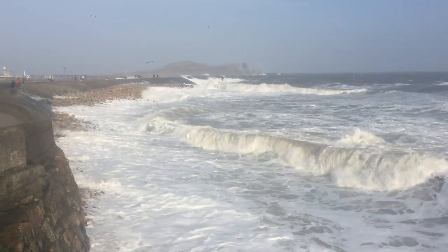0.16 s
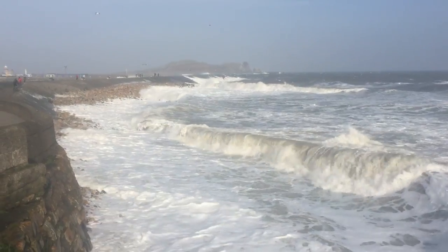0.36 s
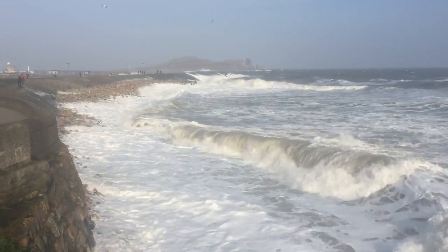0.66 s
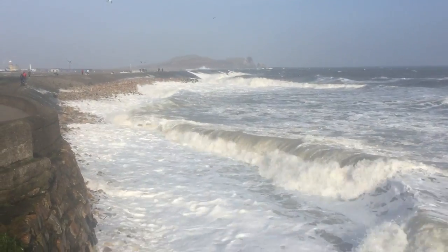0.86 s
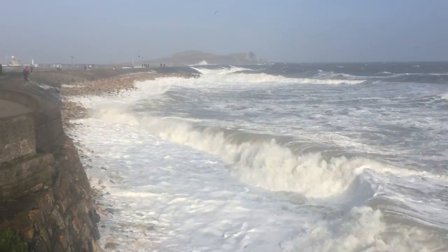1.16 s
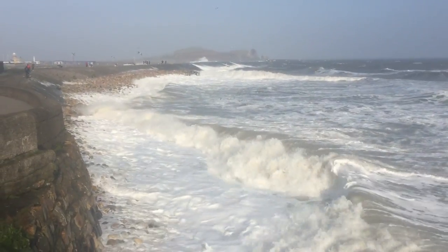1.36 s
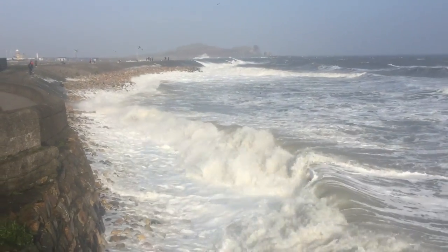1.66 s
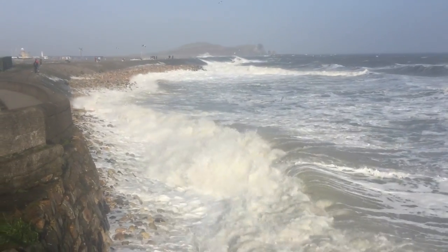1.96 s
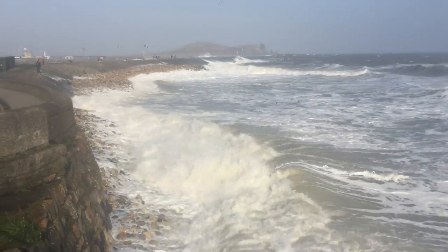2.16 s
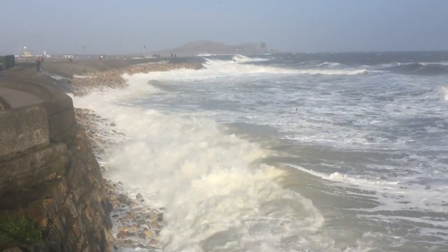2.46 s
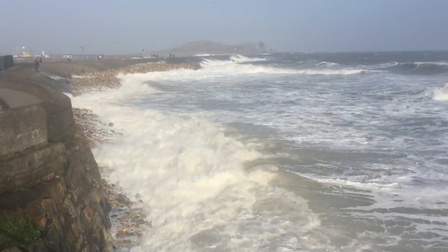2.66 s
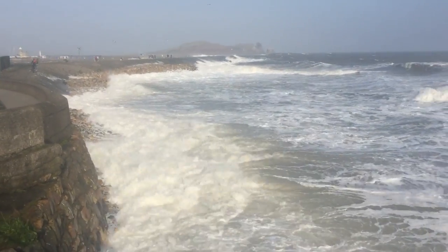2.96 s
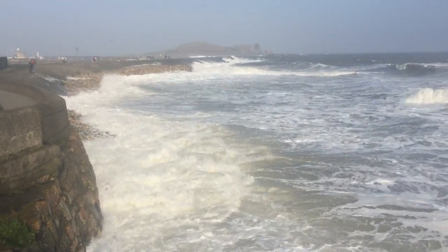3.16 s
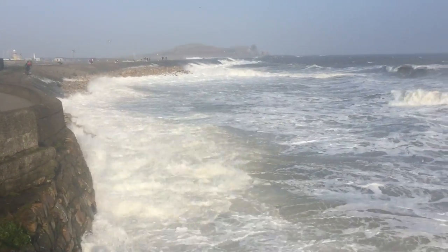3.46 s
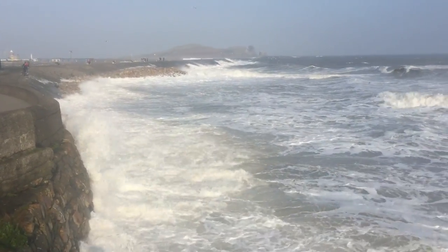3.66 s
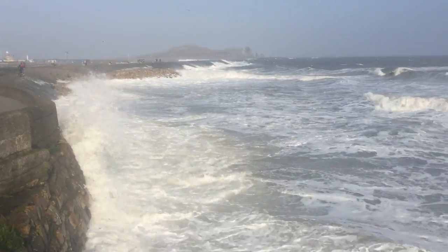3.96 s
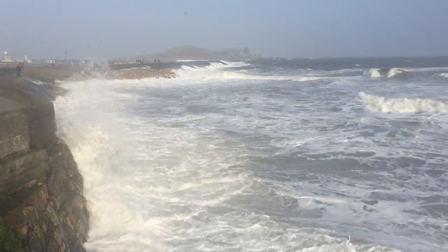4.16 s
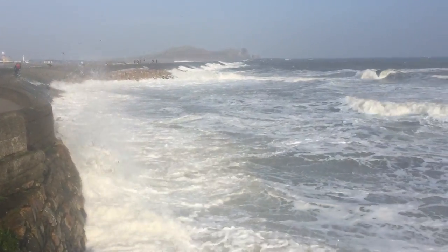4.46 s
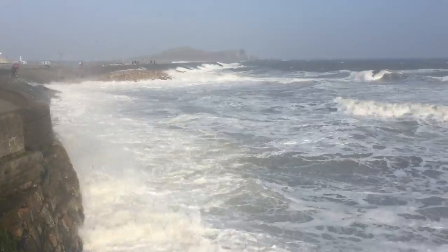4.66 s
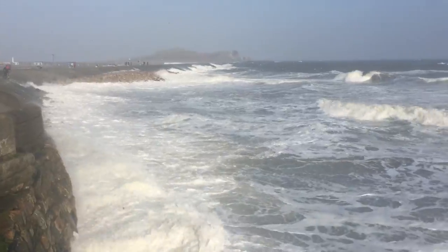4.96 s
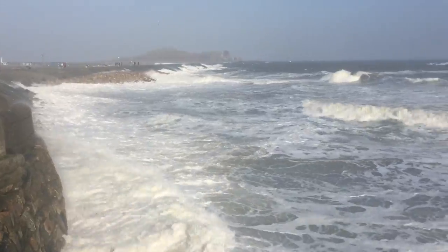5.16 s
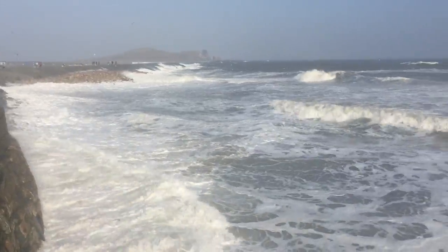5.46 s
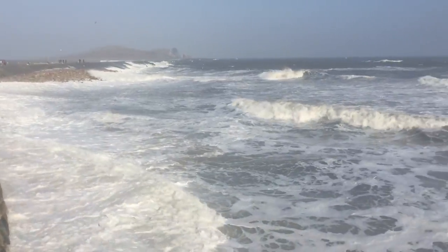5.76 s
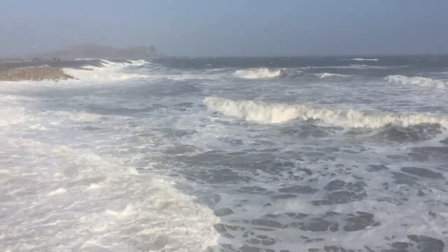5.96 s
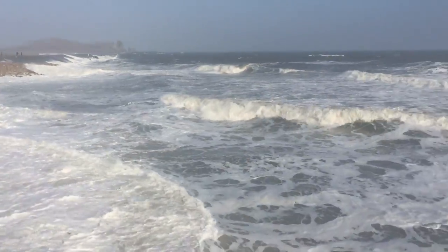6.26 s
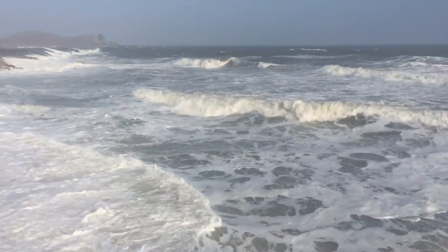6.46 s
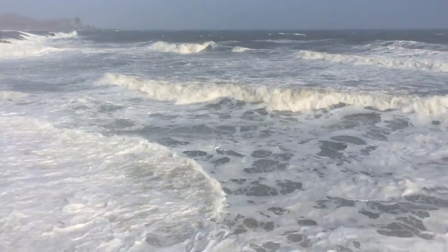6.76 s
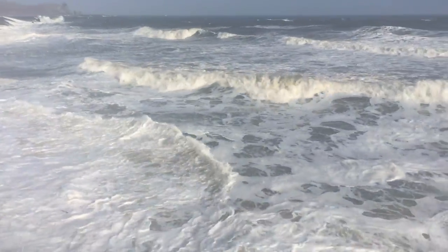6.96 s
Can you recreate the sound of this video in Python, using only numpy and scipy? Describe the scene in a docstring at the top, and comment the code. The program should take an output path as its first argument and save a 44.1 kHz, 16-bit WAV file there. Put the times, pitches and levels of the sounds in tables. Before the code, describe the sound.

Blustery low wind buffeting with sharp pops and tearing bursts dominates, over the continuous grainy roar of heavy breakers by a sea wall.

```python
"""Storm surf, heard through a wind-beaten microphone: breakers roar as noisy grains, foam hisses faintly.
Gusts boom as slow noise on the diaphragm, and eddies swirl and crackle at the microphone port.
Single pops are short snaps with a low push; a few hard blasts are brief bursts of crackle and boom.
The recorder limits the peaks, adds a faint hiss and cuts the lowest and highest tones."""
import sys
import numpy as np
from scipy.fft import rfft, irfft, next_fast_len
from scipy.io import wavfile
from scipy.ndimage import uniform_filter1d, minimum_filter1d, map_coordinates

SR = 44100
rng = np.random.default_rng(int(sys.argv[2]) if len(sys.argv) > 2 else 0)


def transcribe(signal):
    """Save signal, clipped to [-1, 1], as a 16-bit WAV file at the path in sys.argv[1]."""
    frames = np.atleast_2d(signal).T
    limited = np.clip(frames, -1, 1)
    pcm = np.round(limited * 32767).astype(np.int16)
    wavfile.write(sys.argv[1], SR, pcm)


N = 313242
T = np.arange(N) / SR  # time of each sample, s

# tone colour of the wind pushing the diaphragm: f/Hz, level/dB
BOOM_SPECTRUM = [(20, -44.5), (31, -26.5), (42, -6.5), (68, 0), (100, -4), (150, -11), (250, -28),
                 (600, -50.5), (1500, -120)]
# tone colour of eddies tearing at the microphone port: f/Hz, level/dB
PORT_SPECTRUM = [(100, -15), (350, 4.5), (1000, 2.5), (1500, -2), (1900, -4.5), (2300, -1.5), (2500, -7.5),
                 (2800, -16.5), (3400, -26.5), (3900, -32.5), (4400, -50.5), (6000, -66), (8000, -58),
                 (11000, -94)]
# tone colour of the bright edge on pops and blasts: f/Hz, level/dB
EDGE_SPECTRUM = [(2000, -20), (4600, -2), (6000, -9), (7400, 0), (8600, -3), (10300, -30), (15500, -45)]


def surf():
    """Collapsing water and countless bubbles roar; the foam left behind hisses."""
    # strength of the breakers before the lift below: t/s, level/dB
    sea_strength = [(0.03, -33), (0.18, -33), (0.65, -32.5), (2.14, -34.5), (2.32, -35), (2.59, -35.5),
                    (3.29, -36.5), (4.06, -36), (4.21, -33), (4.82, -36.5), (5.19, -35), (5.48, -38.5),
                    (5.66, -36), (6.21, -34.5), (6.77, -35.5), (7.05, -33.5)]
    # strength of the foam before the lift below: t/s, level/dB
    foam_strength = [(0.06, -67.5), (0.41, -68.5), (0.7, -70.5), (0.91, -69), (1.09, -67.5), (1.28, -68),
                     (1.44, -70.5), (1.59, -72.5), (2.04, -67.5), (2.21, -74), (3.43, -77.5), (3.97, -78),
                     (4.38, -78), (4.58, -78.5), (5.2, -75.5), (5.39, -78), (5.58, -77.5), (7.02, -75)]
    # tone colour of the breakers: f/Hz, level/dB
    roar_spectrum = [(100, -20.5), (250, -3), (400, -8), (500, -8.5), (610, 0), (700, 0), (820, -5.5),
                     (1050, -5.5), (1400, -11), (1900, -15.5), (2300, -13), (2700, -24.5), (3500, -30),
                     (4400, -50.5), (6000, -98)]
    # tone colour of the foam: f/Hz, level/dB
    foam_spectrum = [(2000, -22.5), (4500, -7), (5700, -9), (6500, -3), (7200, 0), (7700, -7), (8500, -8),
                     (10300, -26), (15500, -41)]

    roar_db = curve(sea_strength) + 4 + 0.65 * wobble(8.1)
    bubbles = unit(coloured(grains(rate=5000, scatter_db=1.5), roar_spectrum))
    roar = amp(roar_db) * bubbles
    foam_db = curve(foam_strength) + 2.5 + 0.6 * wobble(9)
    return roar + amp(foam_db) * rush(foam_spectrum)


def buffeting():
    """Gusts push the diaphragm; smaller eddies swirl and crackle, most of all at the pressure peaks."""
    # steady push of the wind between gusts: t/s, level/dB
    wind_strength = [(0.0, -31), (0.26, -28), (0.53, -22.5), (0.93, -22), (1.18, -21.5), (1.54, -28.5),
                     (1.78, -23), (1.9, -27), (2.51, -28), (2.67, -29), (3.52, -30), (4.29, -20),
                     (4.47, -21), (5.36, -22.5), (5.61, -26.5), (5.89, -29), (6.86, -27.5), (7.1, -19)]
    # short lulls in which the wind falls away: middle t/s, length t/s
    lull_times = [(2.033, 0.17), (2.377, 0.18), (3.59, 0.062), (3.924, 0.19), (5.137, 0.042), (5.73, 0.21),
                  (6.32, 0.12), (6.748, 0.11)]
    # how hard eddies tear at the port, before the lift below: t/s, level/dB
    crackle_strength = [(0.03, -37), (0.24, -33.5), (1.25, -34), (1.6, -38), (2.05, -37), (2.19, -38),
                        (3.5, -43), (3.74, -37.5), (4.11, -37.5), (4.25, -33.5), (4.88, -33.5), (5.25, -36),
                        (5.37, -36.5), (6.47, -37.5), (6.69, -33), (7.08, -34)]
    # tone colour of the swirling eddies: f/Hz, level/dB
    eddy_spectrum = [(60, -25), (120, -6), (175, 2.5), (230, -1.5), (350, -1), (480, -6.5), (900, -16),
                     (2000, -22.5), (3500, -73), (5000, -120)]

    lull_db = -2.5 * sum(swell(s, length) for s, length in lull_times)
    wind_db = curve(wind_strength) + 1.2 * wobble(16) + lull_db
    gust_boom, gust_swirl = gusts()
    boom_gain = blown(wind_db, gust_boom, level_db=-26, grows=0.86)
    swirl_gain = blown(wind_db, gust_swirl, level_db=-32, grows=0.77)
    crackle_db = curve(crackle_strength) + 1.9 + 0.3 * lull_db + 0.44 * wobble(14)
    # each gust also crackles, 12 dB below its swirl
    crackle_gain = np.hypot(amp(crackle_db), amp(-12) * gust_swirl)

    pressure = steadied(rush(BOOM_SPECTRUM), span=0.07)
    # eddies arrive in clumps that drive both the swirl and the crackle
    clumps = wobble(45) + 0.57 * wobble(130)
    eddies = coloured(grains(rate=900, scatter_db=2.5), eddy_spectrum)
    swirl = steadied(eddies, span=0.083) * unit(amp(1.6 * clumps))
    # stronger pressure, in or out, tears harder
    tearing_db = 1.7 * clumps + 2 * np.minimum(np.abs(pressure), 2)
    tearing = grains(rate=3000, scatter_db=4.0) * amp(tearing_db)
    crackle = steadied(coloured(tearing, PORT_SPECTRUM), span=0.14)
    return boom_gain * pressure + swirl_gain * swirl + crackle_gain * crackle


def gusts():
    """Single gusts swell and fade: returns the gains they give to the boom and to the swirl."""
    # gusts: peak t/s, length t/s, boom level/dB, swirl level/dB
    gust_list = [(0.216, 0.076, -19, -41), (.53, .08, -32, -27), (0.77, 0.071, -25, -29),
                 (0.888, 0.063, -17, -31), (1.04, 0.077, -26, -27), (1.204, 0.094, -19, -25.5),
                 (1.367, 0.11, -17, -30.5), (1.541, 0.086, -21.5, -38), (1.905, 0.11, -18.5, -25.5),
                 (2.205, 0.12, -22.5, -24), (2.57, 0.18, -22.5, -27), (2.682, 0.11, -25.5, -29.5),
                 (2.791, 0.14, -22, -33), (2.99, 0.11, -24, -41), (3.077, 0.06, -32, -25.5),
                 (3.19, 0.068, -22.5, -41), (3.379, 0.1, -22, -38), (3.534, 0.043, -17.5, -26.5),
                 (3.813, 0.1, -26, -25), (3.996, 0.032, -17, -25), (4.145, 0.085, -14, -23),
                 (4.24, 0.071, -20.5, -31), (4.374, .08, -20, -32), (4.504, 0.035, -21, -27),
                 (4.857, 0.14, -20.5, -40), (5.061, .06, -16.5, -27), (5.225, 0.083, -11.5, -27),
                 (5.391, 0.051, -17, -26.5), (5.47, 0.083, -20, -44), (6.063, 0.057, -18, -25),
                 (6.219, 0.15, -23.5, -28.5), (6.472, 0.059, -22, -24.5), (6.646, 0.14, -25, -34),
                 (6.904, 0.072, -34, -25.5), (7.01, .06, -21.5, -30)]
    return sum(amp([[boom_db], [swirl_db]]) * swell(s, length)
               for s, length, boom_db, swirl_db in gust_list)


def blown(wind_db, gust, level_db, grows):
    """Gain of a wind layer: it grows by so many dB per dB of wind, and gusts add their power."""
    usual_wind_db = -26
    return np.hypot(amp(level_db + grows * (wind_db - usual_wind_db)), gust)


def swell(s, length):
    """One smooth hump of height 1 around time s."""
    return np.cos(np.pi * np.clip((T - s) / length, -0.5, 0.5))


def pops():
    """An eddy breaks on the port: a snap, a short splutter, a low push and a bright edge that grows steeply
    with strength."""
    # pops: t/s, strength as level/dB, from which each part takes its own level
    pop_list = [(0.7151, -10), (0.776, -14), (0.9766, -11.5), (1.130, -11.5), (1.3299, -8.5),
                (2.1467, -8.5), (2.1742, -11.5), (2.204, -10), (2.576, -15), (2.769, -16), (2.811, -12.5),
                (3.0133, -13.5), (3.287, -11.5), (3.7889, -13.5), (4.0688, -8.5), (4.1255, -7),
                (4.140, -7.5), (4.1495, -8), (4.2041, -6.5), (4.248, -7), (4.368, -14), (4.3998, -9),
                (4.7383, -12), (4.7911, -13), (4.8812, -12), (5.082, -12), (5.2266, -8), (5.2484, -6.5),
                (5.351, -5.5), (5.5629, -13), (6.2333, -11), (6.6687, -10.5), (6.896, -11.5)]
    push_spectrum = [(500, 1.5), (2000, -20.5), (4000, -49)]  # f/Hz, level/dB

    snaps, pushes, edges = np.zeros((3, N + SR))
    t = np.arange(SR // 16) / SR
    # peak of one filtered click, used to set the height of the snaps
    snap_peak = np.abs(coloured(1.0 * (T == 0), PORT_SPECTRUM)).max()
    u = t / 0.0012
    push = u * (2 - u) * np.exp(-u)  # out, then back in
    for s, db in pop_list:
        start, sign = round(s * SR), rng.choice([-1, 1])
        here = slice(start, start + len(t))
        # the splutter fades by 60 dB in 0.026 s, behind a single click
        snap = 0.11 * rng.standard_normal(len(t)) * amp(-60 * t / 0.026)
        snap[0] = 1
        snaps[here] += sign * amp(db - 3.0) * snap / snap_peak
        pushes[here] += sign * amp(db - 3.5) * push
        # the edge grows by 6 dB for each dB of pop
        edge_db = -38.5 + 6 * (db + 5)
        edges[here] += amp(edge_db - 60 * t / 0.031) * rng.standard_normal(len(t))
    return (coloured(snaps[:N], PORT_SPECTRUM) + coloured(pushes[:N], push_spectrum)
            + coloured(edges[:N], EDGE_SPECTRUM))


def blasts():
    """The hardest gusts tear at the port for a few hundredths of a second and die away fast."""
    # blasts: start t/s, length t/s, tearing level/dB
    blast_list = [(2.179, 0.061, -31), (3.512, 0.024, -26.5), (3.766, 0.065, -31), (3.895, 0.02, -24.5),
                  (4.065, 0.038, -29.5), (4.115, 0.052, -27), (4.198, 0.021, -23), (4.275, 0.035, -26),
                  (4.4, 0.016, -30), (4.734, 0.019, -27.5), (5.123, 0.041, -27.5), (5.217, 0.058, -23.5),
                  (5.326, 0.068, -21), (7.058, 0.057, -28)]
    attack_s, release_s = 0.0086, 0.026

    tearing = np.zeros(N)
    for s, length, tear_db in blast_list:
        rise = (T - s) / attack_s
        fall = 0.5 + (s + length - T) / release_s  # halfway down when the length is over
        gate = np.sin(np.pi / 2 * np.clip(np.minimum(rise, fall), 0, 1)) ** 2
        tearing += amp(tear_db) * gate
    crackle = unit(coloured(grains(rate=1500, scatter_db=2.5), PORT_SPECTRUM))
    boom = steadied(rush(BOOM_SPECTRUM), span=0.035)
    # the bright fringe grows with the square of the strength
    sizzle = unit(coloured(grains(rate=700, scatter_db=0.5), EDGE_SPECTRUM))
    fringe = amp(-24.5) * tearing ** 2 * sizzle
    return tearing * (crackle + boom) + fringe


def amp(db):
    """Decibels to gain."""
    return 10 ** (np.asarray(db) / 20)


def unit(x):
    """Scale to an rms (average strength) of 1."""
    return x / np.sqrt(np.mean(x ** 2) + 1e-20)


def curve(rows):
    """Join (time, value) points by straight lines, one value per sample."""
    s, values = np.transpose(rows)
    return np.interp(T, s, values)


def wobble(rate):
    """A smooth random curve through rate random points a second."""
    return map_coordinates(rng.standard_normal(int(N * rate / SR) + 4), [T * rate])


def coloured(x, spectrum):
    """Filter x to the gains of the (Hz, dB) points, with no sound ahead of its cause."""
    m = 2 * next_fast_len(N // 2 + SR // 4)
    hz, db = np.transpose(spectrum)
    log_hz = np.log(np.fft.rfftfreq(m, 1 / SR) + 1)
    log_gain = np.log(amp(np.interp(log_hz, np.log(hz), db)))
    # folding the cepstrum forward gives the filter its minimum delay
    cepstrum = irfft(log_gain, m)
    cepstrum[1:m // 2] *= 2
    cepstrum[m // 2 + 1:] = 0
    return irfft(rfft(x, m) * np.exp(rfft(cepstrum)), m)[:N]


def rush(spectrum):
    """Coloured noise of rms 1."""
    return unit(coloured(rng.standard_normal(N), spectrum))


def steadied(x, span):
    """Even out the swells of x that are slower than span seconds."""
    power = np.abs(uniform_filter1d(x ** 2, max(int(span * SR), 2)))
    power = uniform_filter1d(power, max(int(span * SR / 2), 2))
    return unit(x / np.sqrt(power + 1e-9))


def grains(rate, scatter_db):
    """Random clicks, rate a second on average, of either sign and scattered size, rms 1."""
    present = rng.random(N) < rate / SR
    sign = np.sign(rng.standard_normal(N))
    return unit(present * sign * amp(scatter_db * rng.standard_normal(N)))


def limited(x, ceiling_db, hold):
    """A fast limiter ducks the gain around the peaks that pass the ceiling; hold is in seconds."""
    width = max(int(hold * SR), 4)
    needed = np.minimum(1, amp(ceiling_db) / (np.abs(x) + 1e-9))
    gain = minimum_filter1d(needed, 2 * width)
    return x * uniform_filter1d(uniform_filter1d(gain, width), width)


def scene():
    """Sea and wind at one microphone."""
    return (surf() + buffeting() + pops() + blasts())[None]


def record(dry):
    """The recorder limits peaks, adds a faint even hiss, and cuts deep rumble and the highest treble."""
    hiss = amp(-82) * rng.standard_normal(N)
    hissy = limited(dry, ceiling_db=-6.0, hold=0.0013) + hiss
    m = next_fast_len(N + SR // 4)
    hz = np.fft.rfftfreq(m, 1 / SR)
    low_cut = hz ** 4 / np.sqrt(hz ** 8 + 32.0 ** 8)  # fades out below 32 Hz
    high_cut = hz < 15750
    return irfft(rfft(hissy, m) * low_cut * high_cut, m)[:, :N]


dry = scene()
out = record(dry)
transcribe(out)
```